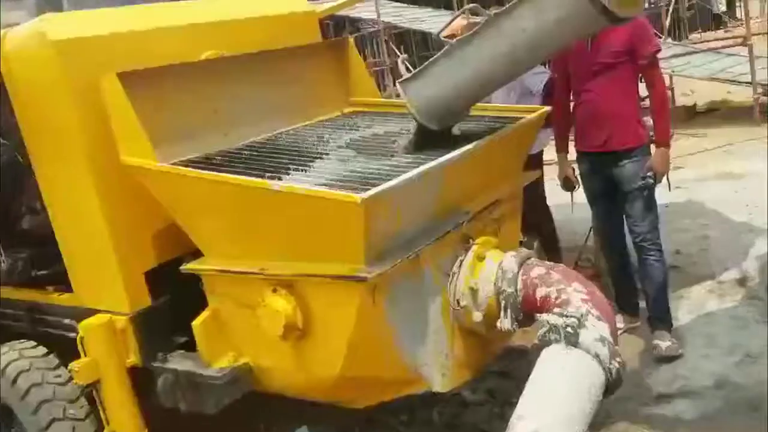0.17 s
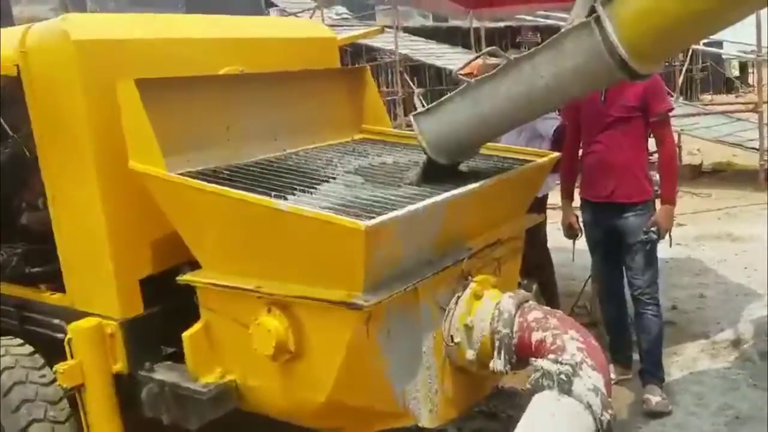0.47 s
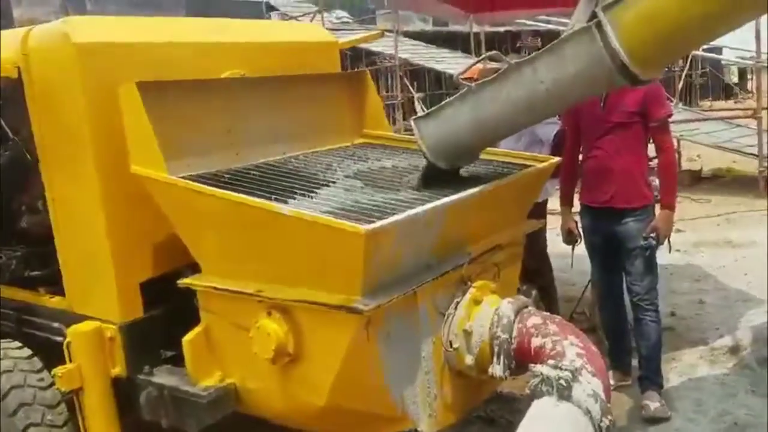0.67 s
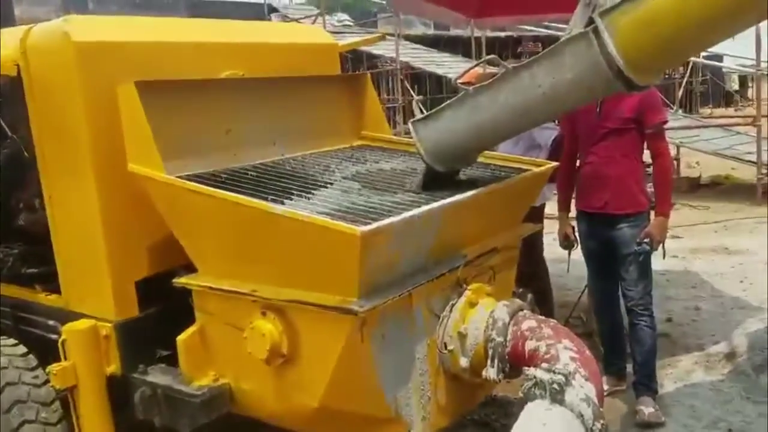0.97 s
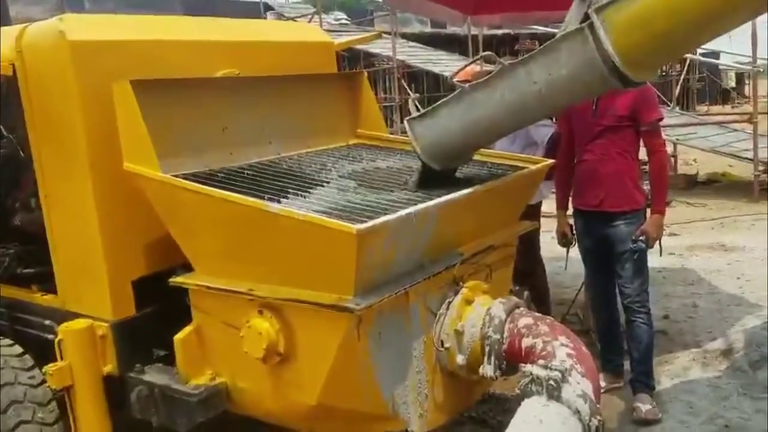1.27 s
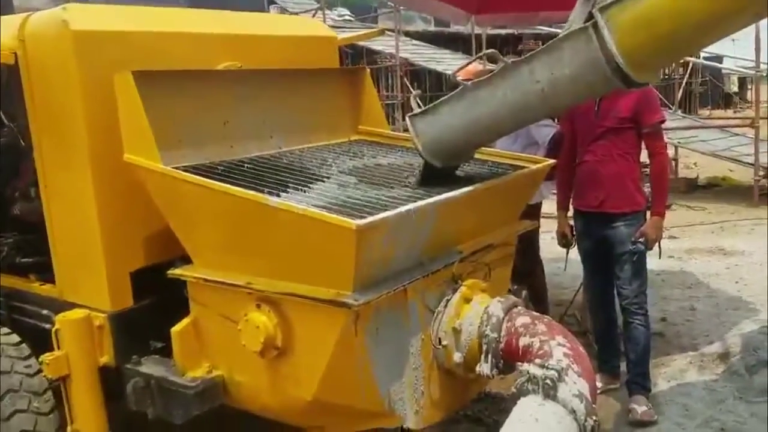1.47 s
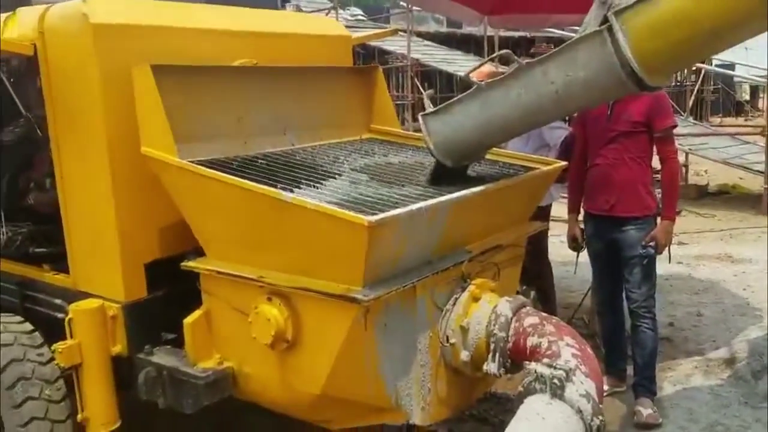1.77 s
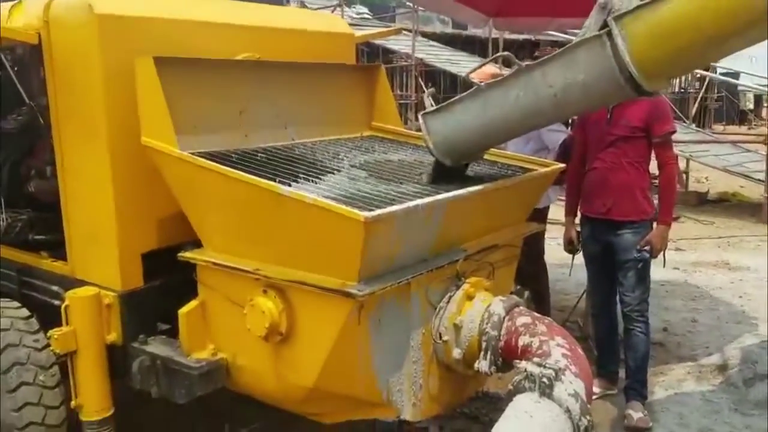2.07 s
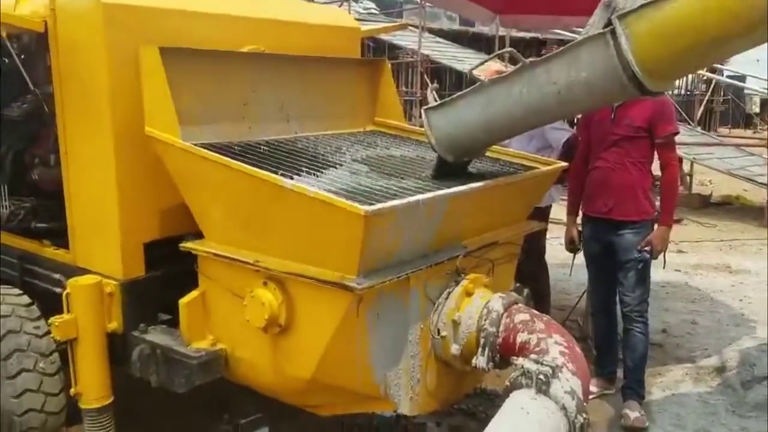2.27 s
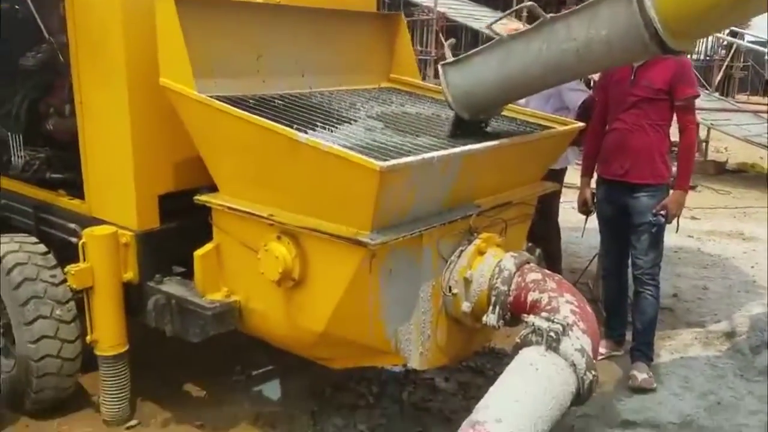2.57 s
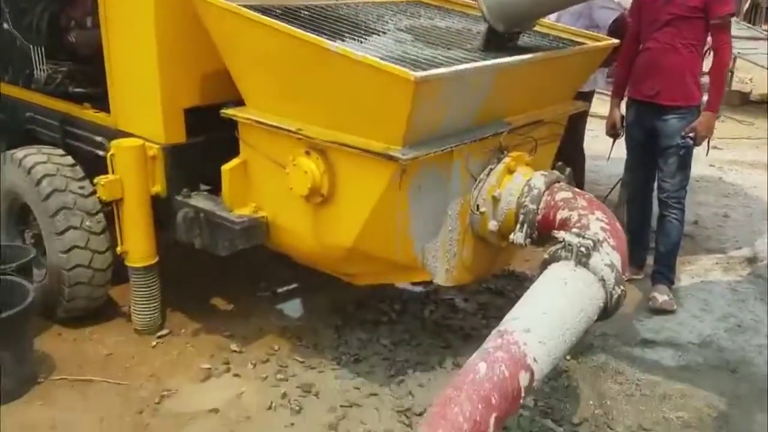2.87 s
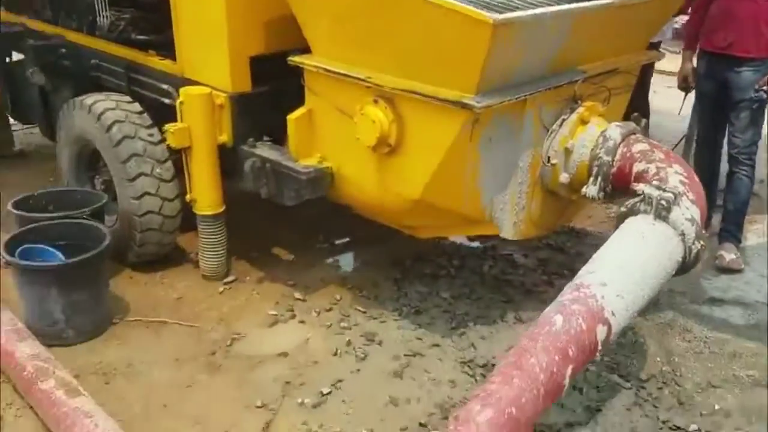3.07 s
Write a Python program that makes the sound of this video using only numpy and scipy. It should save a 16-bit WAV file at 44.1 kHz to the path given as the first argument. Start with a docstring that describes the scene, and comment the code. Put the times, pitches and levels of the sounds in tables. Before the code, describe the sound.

Loud steady concrete pump engine roar with pump whine, clatter, hiss and metallic knocks, close by.

```python
"""A pump whines and moans under load until a short rush of oil ends its stroke; the engine then speeds up and eases.
Around it are thuds, clatter, hiss and a humming fan: a diesel concrete pump close by on an open building site.
One crankshaft speed drives the engine, pump and fan tones, which are wavering sine waves.
The roar, oil and moving air are coloured noise. Firings pulse the roar and shake the ringing steel housing
and grate. Two microphones hear it all, and the left-right balance changes as the listener moves."""
import sys
import numpy as np
from scipy import signal
from scipy.fft import rfft, irfft
from scipy.io import wavfile
from scipy.ndimage import uniform_filter1d, minimum_filter1d

SR = 44100
rng = np.random.default_rng(int(sys.argv[2]) if len(sys.argv) > 2 else 0)


def pcm_store(signal):
    """Save signal as 16-bit PCM."""
    levels = np.round(np.clip(np.atleast_2d(signal), -1, 1) * 32767)
    wavfile.write(sys.argv[1], SR, levels.astype(np.int16).T)


N = 141561
TIME = np.arange(N) / SR
FREQ_HZ = np.arange(N // 2 + 1) * SR / N   # the frequencies of the transform

# Air buffeting the microphones. Each row: frequency in Hz, noise level in dB per Hz.
BUFFET_SPECTRUM = [(15, -2), (30, -7), (55, 4), (100, 3), (200, 4.5)]
BUFFET_DB = -45.5   # before the gusts and the swell

# Spectra of the five registers of the roar. Each row: frequency in Hz, relative level in dB per Hz.
BASS_SPECTRUM = [(15, -30), (35, -28), (55, 0), (80, -23), (120, -2), (165, -4), (220, 0.5), (260, -7.5),
                 (330, -22)]
BODY_SPECTRUM = [(190, -16), (240, -15), (270, 2), (350, 4.5), (410, -1), (490, -2.5), (620, 0.5),
                 (740, -4.5), (850, -16), (1100, -44)]
CLATTER_SPECTRUM = [(550, -16), (780, 0), (1000, 1), (1200, -0.5), (1500, 0.5), (1900, 3), (2200, 3),
                    (2580, -0.5), (2800, -2.5), (3100, -7), (3800, -19)]
HISS_SPECTRUM = [(2300, -14), (3000, -2), (3400, -1), (4000, -1), (4900, -4.5), (6000, -5.5), (7000, -10.5),
                 (8000, -14), (9000, -57), (11000, -36)]
SIZZLE_SPECTRUM = [(6500, -33), (8500, -5.5), (10000, -5.5), (11500, -2), (12600, -3.5), (14000, 2),
                   (15500, -7), (18000, -20)]
# Level of the roar before trims. Each row: time in seconds, then bass, low middle, upper middle,
# treble and top in dB.
ROAR_LEVELS = [(.18, -25.5, -17, -20.5, -31.5, -45), (.28, -32, -19.5, -18.5, -30.5, -43),
               (.46, -29, -23, -20.5, -30, -41.5), (.9, -38, -21, -20, -30.5, -40.5),
               (1.08, -28, -21, -19.5, -28, -40.5), (1.22, -26, -21.5, -19.5, -33, -44),
               (1.3, -29, -21, -19.5, -31, -48), (1.39, -35, -27, -22.5, -34, -46),
               (1.63, -36, -23, -22, -33, -45.5), (1.74, -32, -21, -20.5, -31, -44.5),
               (1.95, -35.5, -20, -19, -29.5, -42.5), (2.25, -29, -21, -17, -28, -40.5),
               (2.6, -37, -19.5, -17, -28.5, -42.5), (2.9, -33.5, -19, -18, -29.5, -41),
               (3.2, -29.5, -19.5, -19.5, -29, -41)]
RATTLE_DB, RATTLE_HZ = 0.65, 300   # fine unevenness shared by the three upper registers
SURGE_DB, SURGE_HZ = 1.25, 15      # slower surges, separate for each of them

# Fan tones, blade rate and octave. Each row: level under load in dB, level when free in dB, before movement.
FAN_TONES = [(-31.5, -27), (-42, -30.5)]
FAN_ORDER = 15.16   # blades passing per turn of the crank
# Level changes as the listener moves. Each row: time in seconds, change for pump, fan and fan octave in dB.
MOVING_LEVELS = [(.2, -9, 0, 1), (.55, -6, 2, 7), (.68, -0.5, -2, 3), (.8, -4.5, -9, 4),
                 (1.02, 3.5, 2.5, -6), (1.17, 2, -6, -9), (1.27, -11, -0.5, 2), (1.44, -6, -0.5, -4),
                 (1.52, -6, -11, -1), (1.65, -12, -12, -3), (1.85, -10, -4, -2), (2.15, -1.5, -3, -6),
                 (2.3, -0.5, -4, 0), (2.55, 2.5, 3.5, -6), (2.85, 2, -10, 4.5), (3.0, 2.5, 1, 5.5),
                 (3.2, 1.5, -9, 5.5)]

HUM_HZ, HUM_DB = 109.9, -43              # a hum of fixed pitch beside the engine tones
PANEL_HZ, PANEL_DB = 699, -35.5          # a singing panel, level before the swell
WHISTLE_HZ, WHISTLE_WIDTH_HZ = 12600, 430   # thin hiss high above the roar
WHISTLE_DB = -46                         # before the swell and flicker

# Loose steel bars of the hopper grate. Each row: pitch in Hz, width in Hz, relative level in dB.
GRATE_BARS = [(1315, 63, -4.5), (1459, 70, -2.5), (1898, 97, -0.5), (2414, 92, 0), (2581, 92, -0.5)]
CHATTER_PER_S, GRATE_DB = 90, -9   # touches of each bar where the firing curve is 1; dB against the clatter

# Resonances of the steel housing. Each row: pitch in Hz, width in Hz, level in dB before the broad resonance.
HOUSING_MODES = [(281, 58, 3), (344, 46, 3), (447.5, 56, -5), (630, 300, -6.5)]
# Hard knocks in the housing. Each row: time in seconds, peak level in dB before the microphones.
KNOCKS = [(.187, -21), (1.699, -17.5), (1.958, -16), (2.186, -8), (2.32, -9), (2.59, -12), (2.733, -15),
          (2.803, -11), (3.124, -9.5)]
THUD_DB, BOOM_DB = -5, -8   # against the low middle of the roar
THUD_JITTER_S = 0.0014      # typical unevenness of the thuds

# Speed of the crankshaft before a slight wobble. Each row: time in seconds, turns per second.
CRANK_SPEED = [(.18, 28.2), (.45, 27.92), (.65, 28.0), (.88, 28.3), (1.11, 28.45), (1.2, 30.5), (1.3, 30.7),
               (1.48, 30.1), (3.2, 29.98)]
# Strength of each cylinder in firing order, one number each, in dB.
CYLINDER_DB = [0, -1, 2.5, -4]
FIRING_DECAY_S, FIRING_SCATTER_DB = 0.021, 2.5
# Engine tones before the swell. Each row: multiple of crank speed, level under load in dB, level free in dB.
ENGINE_TONES = [(2, -38.5, -38), (4, -38, -61.5), (5, -50, -40), (14, -50, -41.5), (21, -35, -34),
                (23, -50, -35), (44, -53, -39)]
# Exhaust drone. Each row: time in seconds, level in dB.
DRONE_LEVEL = [(.2, -48), (.34, -31), (.6, -30.5), (.92, -34), (1.05, -52), (1.25, -34.5), (1.5, -57),
               (2.5, -38), (3.2, -42)]
DRONE_ORDER = 6   # cycles per turn

# Rushes of oil as the valve swings over and settles. Each row: start in seconds, level in dB before rise and decay.
OIL_RUSHES = [(1.112, -10), (1.253, -22), (1.296, -34)]
# Pump tones before movement. Each row: multiple of the piston rate, level early in the stroke in dB,
# level late in the stroke in dB, level free in dB.
PUMP_TONES = [(1, -28.5, -35.5, -32), (3, -50, -53, -32), (4, -33.5, -40, -38), (6, -51, -54, -39.5),
              (7, -38.5, -34.5, -33), (8, -47, -49, -40), (10, -34, -36, -46), (12, -50, -40, -43.5),
              (13, -49, -42, -66), (14, -38.5, -52, -60), (15, -36, -40, -54)]
# The pump's moan at twice the piston rate. Each row: time in seconds, level in dB.
MOAN_LEVEL = [(.28, -34), (.38, -27), (.47, -61), (.6, -39), (.68, -38), (.78, -25.5), (.94, -33),
              (1.04, -24), (1.16, -49)]
PISTONS = 9                              # piston strokes per turn
STROKE_END_S, UNLOAD_S = 1.11, 0.02      # when the load comes off, and how fast
STRAIN_S, STRAIN_RISE_S = 0.85, 0.046    # when the whine changes colour, and how fast

# Balance of the two microphones. Each row: frequency in Hz, left minus right in dB.
BALANCE = [(30, 6), (60, 8.5), (125, 2.9), (200, 1.4), (280, 0), (550, 0.7), (750, -1.5), (950, -5.5),
           (1500, -7.5), (2200, -7.5), (3200, -4.3), (5000, -3.7), (7000, -1), (9000, 2.9), (14000, 4)]
# How alike the noise is in both. Each row: frequency in Hz, likeness from 0 to 1.
LIKENESS = [(30, .45), (70, .42), (125, .6), (200, 0.64), (280, 1), (360, 0.78), (500, 1), (1000, 0.64),
            (2000, 0.43), (4000, 0.1), (8000, 0.12), (14000, 0.15)]
# How much earlier the left one hears. Each row: frequency in Hz, lead in milliseconds.
LEFT_LEAD_MS = [(30, 2), (60, 3.3), (125, 0.62), (280, 0.079), (500, 0.09), (1000, 0.16), (1900, 0.21),
                (2600, 0.37), (4600, 0.467), (8000, 0.443), (14000, 0.313)]
# Extra balance before the listener moves down beside the machine. Each row: frequency in Hz, left minus right in dB.
EARLY_BALANCE = [(280, 0.5), (550, -0.5), (850, 5), (1400, 0.5), (2400, -4.5), (3700, -3), (5400, -8),
                 (7500, 0), (12000, -1.5)]
MOVE_S, MOVE_LENGTH_S = 1.98, 0.14

START_S, FADE_IN_S = .181, .002
CEILING, LIMITER_S = .93, .004
CUTOFF_HZ = 15350


def from_db(db):
    """Turn decibels into gain."""
    return 10 ** (np.asarray(db) / 20)


def rms_one(x):
    """Scale to an average strength (rms) of 1."""
    return x / np.sqrt(np.mean(x ** 2) + 1e-20)


def in_time(rows):
    """Draw one curve over time for each column of a table."""
    s, *columns = np.transpose(rows)
    return [np.interp(TIME, s, column) for column in columns]


def at_hz(points, hz):
    """Read a table over log frequency."""
    f, value = np.transpose(points)
    return np.interp(np.log(np.maximum(hz, 1)), np.log(f), value)


def step(at_s, width_s):
    """Rise smoothly from 0 to 1."""
    return .5 + .5 * np.tanh((TIME - at_s) / width_s)


def drift(rate_hz):
    """Wander by chance with spread 1; changes faster than the rate are weakened."""
    slow = (FREQ_HZ > 0) / (1 + (FREQ_HZ / rate_hz) ** 2)
    return rms_one(irfft(rfft(rng.standard_normal(N)) * slow, N))


def resonance(hz, width_hz):
    """Response of one ringing part, 1 at its own pitch."""
    damping = 1j * FREQ_HZ * width_hz
    return damping / (hz ** 2 - FREQ_HZ ** 2 + damping)


def microphones(hz):
    """Level and phase at the left and right microphone, as complex gains."""
    half_lead = np.exp(1j * np.pi * hz * at_hz(LEFT_LEAD_MS, hz) / 1000)
    left = from_db(at_hz(BALANCE, hz) / 2) * half_lead
    return np.array([left, 1 / left])


def noise(response, pulsing=1):
    """Stereo noise, pulsed and then coloured; the average of both sides has rms 1."""
    mid, side = rfft(rng.standard_normal((2, N)) * pulsing)
    alike = np.clip(at_hz(LIKENESS, FREQ_HZ), 0, .99)
    pair = np.sqrt(1 + alike) * mid + np.sqrt(1 - alike) * side * [[1], [-1]]
    out = irfft(pair * response * microphones(FREQ_HZ), N)
    return out / out.mean(axis=0).std()


def roar(spectrum, pulsing=1):
    """Noise with the given spectrum, falling away steeply beyond its ends."""
    below = spectrum[0][0] / (FREQ_HZ + 1)
    above = FREQ_HZ / spectrum[-1][0]
    outside = np.maximum(np.maximum(below, above), 1)
    return noise(from_db(at_hz(spectrum, FREQ_HZ)) / outside ** 4, pulsing)


def tone(cycles, db, waver_db, smear_rad):
    """A sine wave wavering in level and phase, placed between the microphones by its average pitch."""
    gains = microphones(np.array([cycles[-1] / TIME[-1]]))
    phase = 2 * np.pi * (cycles + rng.random()) + smear_rad * drift(23)
    level = np.sqrt(2) * from_db(db + waver_db * drift(30.0))
    return level * np.real(np.exp(1j * phase) * gains / abs(gains.mean()))


def tones(table, cycles, shares, waver_db, smear_rad):
    """A family of harmonics whose levels blend between the working states."""
    total = 0
    for multiple, *state_db in table:
        db = sum(share * level for share, level in zip(shares, state_db))
        total = total + tone(round(multiple) * cycles, db, waver_db, smear_rad)
    return total


def firings(turns):
    """Two firings a turn, each a burst that dies away with its cylinder's strength; rms 1."""
    stroke = (2 * turns).astype(int)
    age_s = (2 * turns - stroke) / (2 * np.gradient(turns) * SR)
    scatter_db = FIRING_SCATTER_DB * rng.standard_normal(stroke[-1] + 1)
    strength_db = np.take(CYLINDER_DB, stroke, mode="wrap") + scatter_db[stroke]
    return rms_one(from_db(strength_db) * np.exp(-age_s / FIRING_DECAY_S))


def buffeting(gust_db):
    """Lumpy low noise of air moving on the microphones."""
    return from_db(BUFFET_DB + gust_db * drift(5.9)) * roar(BUFFET_SPECTRUM)


def whistle(swell_db):
    """Narrow high noise that flickers and swells with the clatter."""
    level_db = WHISTLE_DB + 1.3 * swell_db + 4.3 * drift(7.3)
    return from_db(level_db) * noise(resonance(WHISTLE_HZ, WHISTLE_WIDTH_HZ))


def hum():
    """A hum of fixed average pitch that wavers strongly in level."""
    return tone(HUM_HZ * TIME, HUM_DB, waver_db=5.5, smear_rad=0.48)


def panel(swell_db):
    """A singing panel that swells twice as many decibels as the clatter."""
    return tone(PANEL_HZ * TIME, PANEL_DB + 2 * swell_db, waver_db=1.5, smear_rad=0.93)


def squeak(s, length_s, hz, db):
    """One metallic squeak that swells and fades around its middle."""
    return tone(hz * TIME, db, waver_db=0, smear_rad=0) * np.exp(-((TIME - s) / length_s) ** 2)


def fan(turns, load, levels_db):
    """The blades hum at their passing rate and its octave."""
    total = 0
    for k, ((loaded, free), moving_db) in enumerate(zip(FAN_TONES, levels_db)):
        db = free + load * (loaded - free) + moving_db
        total = total + tone((k + 1) * FAN_ORDER * turns, db, waver_db=3.0, smear_rad=0.63)
    return total


def machinery(firing, bass_db, body_db, clatter_db, hiss_db, sizzle_db):
    """Exhaust rumble, fan roar, clatter and hiss as noise that throbs with the firings."""
    rattle = from_db(RATTLE_DB * drift(RATTLE_HZ))
    surges = [from_db(SURGE_DB * drift(SURGE_HZ)) for k in range(3)]
    return (from_db(bass_db - 2.0) * roar(BASS_SPECTRUM, 1 + 0.85 * firing)
            + from_db(body_db - 2.0) * roar(BODY_SPECTRUM, 1 + 0.37 * firing)
            + from_db(clatter_db - 1.12) * roar(CLATTER_SPECTRUM, surges[0] * rattle * (1 + 0.053 * firing))
            + from_db(hiss_db - 0.92) * roar(HISS_SPECTRUM, surges[1] * rattle * (1 + 0.064 * firing))
            + from_db(sizzle_db - 1.2) * roar(SIZZLE_SPECTRUM, surges[2] * rattle * (1 + 0.2 * firing)))


def grate(firing, level_db):
    """Loose steel bars, touched more often during firings, ring briefly."""
    size = (len(GRATE_BARS), N)
    touched = rng.random(size) < CHATTER_PER_S * firing / SR
    hits = touched * rng.standard_normal(size)
    rings = 0
    for hit, (hz, width, db) in zip(hits, GRATE_BARS):
        rings = rings + rfft(hit) * from_db(db) * resonance(hz, width) ** 2
    return from_db(level_db + GRATE_DB) * rms_one(irfft(rings * microphones(FREQ_HZ), N))


def housing(turns, firing, level_db):
    """Firings and hard knocks strike the ringing panels; noise pulsed by the same firings booms along with them."""
    body = 0
    for k, (hz, width, db) in enumerate(HOUSING_MODES):
        body = body + (-1) ** k * from_db(db) * resonance(hz, width)
    body = body * resonance(hz=330, width_hz=460)

    at = np.flatnonzero(np.diff((2 * turns).astype(int)))   # the sample where each firing begins
    late, strong = rng.standard_normal((len(at), 2)).T
    cylinder_db = np.take(CYLINDER_DB, np.arange(len(at)) + 1, mode="wrap")
    thud_db = level_db[at] + THUD_DB + cylinder_db + FIRING_SCATTER_DB * strong
    struck = np.clip(at + (THUD_JITTER_S * SR * late).astype(int), 0, N - 1)
    blows = np.zeros(N)
    blows[struck] = from_db(thud_db)
    for s, db in KNOCKS:
        blows[int(s * SR)] += from_db(db)

    one_blow_peak = abs(irfft(body, N)).max()
    thuds = irfft(rfft(blows) * body * microphones(FREQ_HZ), N) / one_blow_peak
    return thuds + from_db(level_db + BOOM_DB) * noise(body, firing)


def engine(turns, load, swell_db):
    """Crankshaft harmonics that swell with the clatter, more so when free."""
    harmonics = tones(ENGINE_TONES, turns, (load, 1 - load), waver_db=3.0, smear_rad=0.67)
    return harmonics * from_db(.5 * swell_db * (2.5 - load))


def exhaust_drone(turns):
    """One harmonic of the crankshaft drones from the exhaust."""
    return tone(DRONE_ORDER * turns, in_time(DRONE_LEVEL)[0], waver_db=-1.5, smear_rad=0.6)


def oil(load, hz, width_hz, db):
    """Oil under pressure hisses in the lines as a band of noise."""
    return from_db(db) * load * noise(resonance(hz, width_hz) ** 2)


def valve(attack_s, decay_s, hz, width_hz):
    """Rushes of oil as bursts of noise that start suddenly and die away."""
    flow = 0
    for s, db in OIL_RUSHES:
        rise = np.clip((TIME - s) / attack_s, 0, 1)
        flow = flow + from_db(db) * rise * np.exp(-np.maximum(TIME - s, 0) / decay_s)
    return flow * noise(resonance(hz, width_hz) ** 2)


def pump(turns, load, level_db):
    """The pistons whine in harmonics that change late in the stroke, and moan at twice their rate."""
    strain = step(STRAIN_S, STRAIN_RISE_S)
    shares = (load * (1 - strain), load * strain, 1 - load)   # early, late, free
    whine = tones(PUMP_TONES, PISTONS * turns, shares, waver_db=3.1, smear_rad=0.28)
    moan = tone(2 * PISTONS * turns, in_time(MOAN_LEVEL)[0], waver_db=2.0, smear_rad=0.19)
    return whine * from_db(level_db) + moan


def listener(x):
    """Change the balance between the microphones as the listener moves."""
    power = abs(microphones(FREQ_HZ)) ** 2
    shift = from_db(at_hz(EARLY_BALANCE, FREQ_HZ) / 2 * np.array([[1], [-1]]))
    keep_power = np.sqrt(power.sum(axis=0) / (power * shift ** 2).sum(axis=0))
    early = irfft(rfft(x) * shift * keep_power, N)
    return early + (x - early) * step(MOVE_S, MOVE_LENGTH_S)


def scene():
    """Add all sources, with engine, pump and fan tied to one crankshaft."""
    speed, = in_time(CRANK_SPEED)
    turns = np.cumsum(speed * (1 + 0.00049 * drift(11.5))) / SR
    load = 1 - step(STROKE_END_S, UNLOAD_S)
    levels = in_time(ROAR_LEVELS)
    body_db, clatter_db = levels[1:3]
    pump_db, *fan_db = in_time(MOVING_LEVELS)
    swell_db = clatter_db - clatter_db.max()   # 0 where the clatter is loudest
    firing = firings(turns)
    mix = buffeting(gust_db=4.5) * from_db(0.81 * swell_db + 4.5)
    mix += whistle(swell_db) + hum() + panel(swell_db)
    mix += squeak(s=0.283, length_s=0.028, hz=2590, db=-21.5)
    mix += fan(turns, load, fan_db)
    mix += machinery(firing, *levels)
    mix += grate(firing, clatter_db)
    mix += housing(turns, firing, body_db)
    mix += engine(turns, load, swell_db) + exhaust_drone(turns)
    mix += oil(load, hz=2550, width_hz=850, db=-30.0)
    mix += valve(attack_s=0.0017, decay_s=0.017, hz=1180, width_hz=1480)
    mix += pump(turns, load, pump_db)
    return listener(mix)


def record(dry):
    """The sound cuts in, a fast limiter holds the peaks, and a steep filter cuts the top."""
    x = dry * np.clip((TIME - START_S) / FADE_IN_S + .5, 0, 1)
    size = int(LIMITER_S * SR)
    safe_gain = CEILING / np.maximum(abs(x).max(axis=0), CEILING)
    held = x * uniform_filter1d(minimum_filter1d(safe_gain, size), size)
    top_cut = signal.ellip(12, .1, 80, CUTOFF_HZ, fs=SR, output="sos")
    return signal.sosfilt(top_cut, held)


dry = scene()
out = record(dry)
pcm_store(out)
```